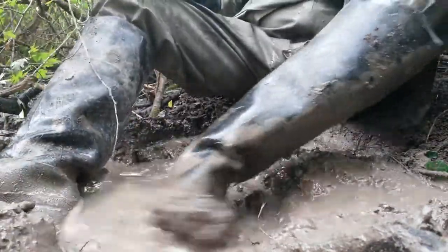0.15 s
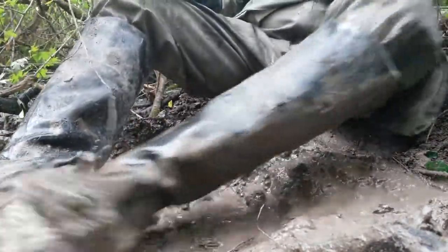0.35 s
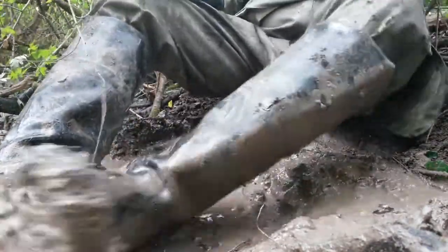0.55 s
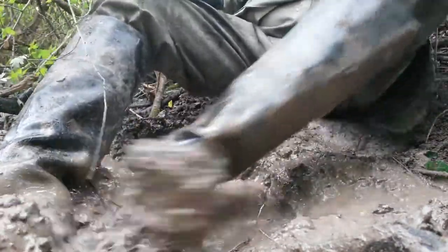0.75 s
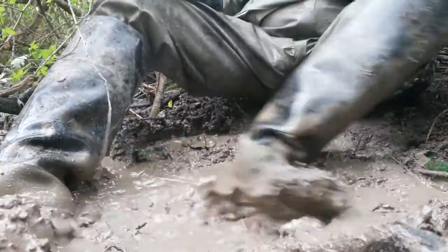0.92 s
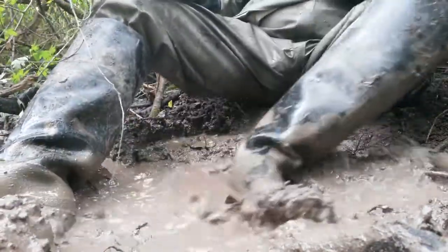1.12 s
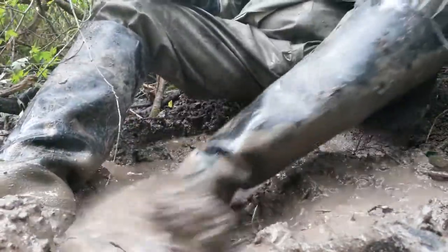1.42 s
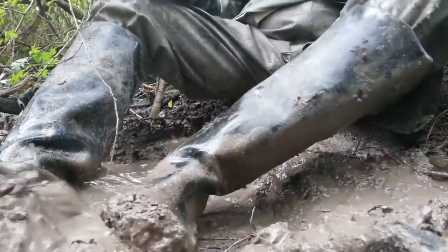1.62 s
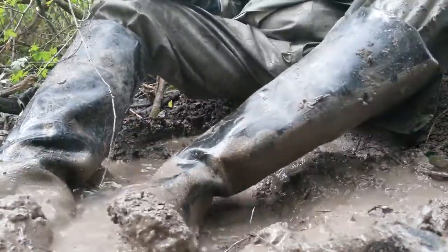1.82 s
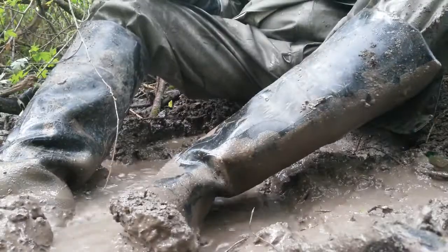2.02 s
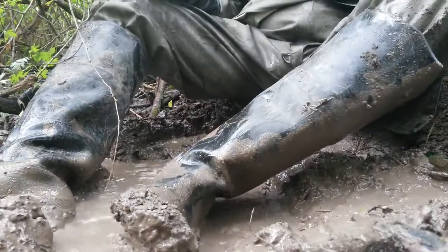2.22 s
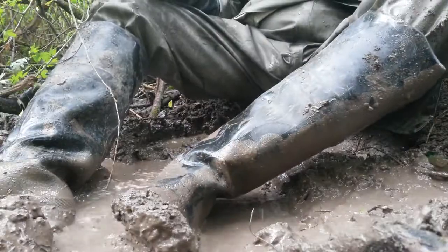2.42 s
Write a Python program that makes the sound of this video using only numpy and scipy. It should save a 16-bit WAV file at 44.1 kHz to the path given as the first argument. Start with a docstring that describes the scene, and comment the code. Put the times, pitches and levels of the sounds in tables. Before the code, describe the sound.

A rubber boot squelches through a muddy puddle close by, with gurgles, fizzing bubbles, wet snaps and droplet ticks over a faint low rumble. The sloshing builds from 0.2 seconds, with surges near 0.4, 0.65 and 1.0. A last squelch comes around 1.6, fading by 2 seconds. One dry electrical pop sounds on the right at 2.1, then only faint outdoor air remains.

```python
"""Sharp ticks sound over a faint fizz and a low rumble: a rubber boot sweeps to and fro through a muddy puddle,
close by in a quiet wood. Air pockets ring as rising bubbles, wet films snap, mud slaps back, and swarms of tiny
bubbles make the churned mud fizz and gurgle until the boot comes to rest. The microphone's two openings colour
the sound differently; in the stillness one dry electrical pop sounds on the right."""
import sys
import numpy as np
from scipy import signal
from scipy.fft import rfft, irfft, next_fast_len
from scipy.io import wavfile

SR = 44100
rng = np.random.default_rng(int(sys.argv[2]) if len(sys.argv) > 2 else 0)


def put_to_file(sound):
    """Save the sound as 16-bit audio at rate SR, in the file named by the first command-line argument."""
    columns = np.atleast_2d(sound).T  # one column per channel
    safe = np.clip(columns, -1, 1)
    whole_steps = np.round(safe * 32767)
    wavfile.write(sys.argv[1], SR, whole_steps.astype(np.int16))


N = 112454
T = np.arange(N) / SR
BUBBLE_LAG_S, CLICK_LAG_S = 0.00018, 0.00004  # how much later the left side hears a sound
SNAP_LEAD_S = 0.0032  # a film crackles this long before it rings


def undb(db):
    """Turn decibels into a volume factor."""
    return 10 ** (np.asarray(db) / 20)


def unit(x):
    """Scale a sound to an average strength (rms) of 1."""
    return x / np.sqrt(np.mean(x ** 2))


def colour(x, points):
    """Make some pitches louder and others softer, along a curve of (Hz, dB) points."""
    hz, db = np.array(points, float).T
    size = 2 * next_fast_len(N)
    freqs = np.maximum(np.fft.rfftfreq(size, 1 / SR), 1)
    gain = undb(np.interp(np.log(freqs), np.log(hz), db))
    # these steps make the filter ring only after a sound, never before it
    cepstrum = irfft(np.log(gain))
    cepstrum[1:size // 2] *= 2
    cepstrum[size // 2 + 1:] = 0
    return irfft(rfft(x, size) * np.exp(rfft(cepstrum)))[..., :N]


def noise(points, alike):
    """Coloured stereo noise; alike (0 to 1) is the share that both sides have in common."""
    white = rng.standard_normal((3, N))
    stereo = np.sqrt(alike) * white[2] + np.sqrt(1 - alike) * white[:2]
    return unit(colour(stereo, points))


def wander(per_second):
    """A curve that glides between random values, mostly within -1 to 1."""
    return np.interp(T * per_second, np.arange(2000), rng.standard_normal(2000))


def add(out, start_s, wave, pan_db=0., lag_s=0.):
    """Mix a short sound in; the left side gets it pan_db louder and lag_s later."""
    for channel, side in enumerate((1, -1)):
        first = max(int((start_s + side * lag_s / 2) * SR), 0)
        part = wave[:max(N - first, 0)]
        out[channel, first:first + len(part)] += part * undb(side * pan_db / 2)


def background():
    """Still air hisses faintly, and a low rumble lasts while the leg moves."""
    # tone of the air and of the rumble (frequency [Hz], relative level [dB])
    air_tone = [(20, -2.5), (45, 0.5), (70, 6), (150, 0.5), (300, -10), (700, -17), (2000, -22.5),
                (4800, -26), (7500, -31.5), (15000, -38)]
    rumble_tone = [(20, -24), (50, 5.5), (80, 4), (160, -2.5), (350, -9), (1000, -38.5), (15000, -79.5)]
    air = undb(-55) * noise(air_tone, alike=0.45)
    rumble = undb(-50.5 + 2 * wander(14)) * noise(rumble_tone, alike=0.9)
    moving = 1 / (1 + np.exp((T - 2.005) / 0.078))  # fades out around 2 s
    return air + moving * rumble


def bubble(hz, length_s, rise):
    """An air pocket rings, climbs in pitch as it surfaces (falls if rise is negative), and dies away."""
    fade_s = 0.39 * length_s
    t = np.arange(int((length_s + 6 * fade_s) * SR) + 2) / SR
    pitch = hz * (1 + rise * np.minimum((t / length_s) ** 2, 3))
    loudness = (1 - np.exp(-t * hz)) * np.exp(-np.maximum(t - 0.66 * length_s, 0) / fade_s)
    return loudness * np.sin(2 * np.pi * np.cumsum(pitch) / SR)


def swarm(count, low_hz, high_hz, cycles, spread_db, pan_db, rise):
    """Many small bubbles ring, each with a random time, pitch, loudness and place."""
    out = np.zeros((2, N))
    for when, pitch, size, ring, place, lag in rng.random((count, 6)):
        hz = min(low_hz * (high_hz / low_hz) ** pitch, SR / 3)
        db = spread_db * min(-np.log(1 - size), 3)  # most are quiet, a few are loud
        wave = undb(db) * bubble(hz, cycles * (0.5 + ring) / hz, rise)
        add(out, when * N / SR, wave, pan_db * (2 * place - 1), BUBBLE_LAG_S * 2 * lag)
    return unit(out)


def churned_mud():
    """The boot stirs the mud: fizzing spray over gurgles and a low wash."""
    # strength of the churning (time [s], relative spray level [dB], relative gurgle level [dB])
    churn = [(0, -58.5, -58), (.17, -57, -52.5), (0.239, -48.5, -35), (.28, -45, -46), (0.336, -45, -47),
             (.385, -34.5, -36.5), (.43, -40.5, -40), (.485, -43, -38), (.51, -45, -37), (.55, -45.5, -44),
             (.615, -33, -35.5), (.665, -40, -42.5), (.71, -45, -41), (0.793, -45, -44.5),
             (0.821, -34, -48), (.87, -49.5, -40.5), (.93, -45.5, -46.5), (0.974, -32.5, -41),
             (1.013, -30.5, -28), (1.059, -38, -42), (1.109, -38.5, -48), (1.16, -48.5, -53),
             (1.238, -38, -63), (1.29, -54.5, -55), (1.42, -54, -53), (1.48, -45, -46.5),
             (1.545, -55.5, -49.5), (1.638, -40, -55), (1.71, -51.5, -59.5), (1.8, -54, -62),
             (2, -64.5, -69), (2.2, -89, -84)]
    # tone of the fine mist and of the low wash (frequency [Hz], relative level [dB])
    mist_tone = [(20, -55), (500, -0.5), (1500, -2), (4500, 3), (7500, -8.5), (15000, -9.5)]
    wash_tone = [(20, -10), (60, -16), (140, 3), (300, -3), (700, -4), (1400, -13.5), (3000, -34.5),
                 (15000, -37.5)]
    times, spray_db, gurgle_db = np.array(churn).T
    fizz = swarm(5200, low_hz=1374, high_hz=15530, cycles=2.16, spread_db=4.5, pan_db=14.5, rise=0.095)
    mist = undb(-7.5) * noise(mist_tone, alike=0.17)
    flicker = undb(2.9 * np.tanh(wander(110)))
    spray = (undb(-3.5) * fizz + mist) * flicker
    glugs = swarm(1300, low_hz=371, high_hz=2284, cycles=1.83, spread_db=5.5, pan_db=10, rise=0.088)
    wash = undb(-6.5 + 2 * wander(37.96)) * noise(wash_tone, alike=0.94)
    gurgle = undb(-4.5) * glugs + wash
    return spray * undb(np.interp(T, times, spray_db)) + gurgle * undb(np.interp(T, times, gurgle_db))


def burst(hz, decay_s):
    """A small hollow tears open: a quickly dying tone, roughened by its ragged rim."""
    t = np.arange(int(7 * decay_s * SR) + 8) / SR
    ragged = np.interp(t * hz * 3, np.arange(512), rng.standard_normal(512))
    loudness = (1 - np.exp(-2 * t * hz)) * np.exp(-t / decay_s)
    return loudness * (np.sin(2 * np.pi * hz * t) + 0.39 * ragged)


def short_snaps():
    """Further wet films snap very briefly, each a tiny sharp tick with a common pitch."""
    # very short snaps (time [s], level [dB])
    ticks = [(.0175, -22), (.029, -23), (.0478, -23), (.1419, -8.5), (.3222, -13), (.388, -9),
             (.4065, -10), (.439, -15), (0.602, -11.5), (1.0858, -15), (1.089, -4), (1.0988, -5),
             (1.1355, -17), (1.186, -17), (1.2095, -28), (1.2277, -8), (1.4613, -15), (1.601, -9),
             (1.7315, -25)]
    out = np.zeros((2, N))
    for s, db in ticks:
        add(out, s, undb(db) * burst(hz=5500, decay_s=0.00007), lag_s=CLICK_LAG_S)
    return out


def air_pockets():
    """Single bubbles stand out; the torn rim of each rings briefly above its pitch."""
    # closing pockets (time [s], pitch [Hz], relative level [dB], length [ms], rise [share of pitch])
    pockets = [(0.187, 2120, -37, 5.2, 0.043), (.237, 690, -29.5, 4.1, 0.049),
               (0.2958, 934, -30.5, 6.6, 0.22), (0.3055, 1275, -24, 2.8, -0.023),
               (0.3737, 1118, -13.5, 2.5, -0.11), (.389, 640, -27, 2.3, 0.007),
               (.4317, 594, -23, 2.6, 0.072), (0.4444, 1300, -29, 6.9, 0.061),
               (0.566, 910, -24.5, 3.7, -0.078), (0.5747, 1165, -27.5, 8.7, 0.14),
               (0.5857, 1410, -18, 2.45, 0.2), (.5985, 660, -15, 3.03, 0.021), (.621, 557, -30.5, 10, 0.08),
               (0.6935, 1210, -21.5, 3.1, 0.052), (.8205, 690, -25.5, 3.9, -0.1),
               (.91, 724, -41, 23, -0.00089), (0.9637, 1060, -23.5, 3, -0.018),
               (1.181, 1940, -31, 3.4, -0.012), (1.2277, 846, -24, 20, 0.34),
               (1.313, 1284, -44, 7.9, -0.00017), (1.585, 1067, -31.5, 11.3, -0.013),
               (1.6145, 955, -16.5, 3.26, -0.02), (1.6197, 805, -16.5, 4.3, -0.011),
               (1.6275, 800, -28, 5, -0.014), (1.7306, 980, -33.5, 3.9, -0.099),
               (1.779, 1067, -31.5, 4.5, -0.037)]
    out = np.zeros((2, N))
    for s, hz, db, ms, rise in pockets:
        add(out, s, undb(db + 0.5) * bubble(hz, ms / 1000, rise), lag_s=BUBBLE_LAG_S)
        rim = undb(db - 5) * burst(2.22 * hz, decay_s=0.00092)
        add(out, s, rim, lag_s=BUBBLE_LAG_S)
    return out


def snap(hz, decay_s):
    """A wet film tears with a brief swelling crackle and leaves its small hollow ringing."""
    crackle_s = 0.0008
    t = np.arange(int((7 * decay_s + 10 * crackle_s) * SR) + 8) / SR - SNAP_LEAD_S
    since_tear = np.maximum(t, 0)
    jitter, hiss = rng.standard_normal((2, 2048))
    waver = np.interp(since_tear * hz / 2, np.arange(len(jitter)), jitter)
    loudness = (1 - np.exp(-since_tear * hz / 2)) * np.exp(-since_tear / decay_s)
    ring = loudness * np.sin(2 * np.pi * hz * since_tear + waver)
    crackle = np.resize(hiss, len(t)) * np.exp(-np.abs(t) / crackle_s) / 2
    return ring + undb(-13) * crackle


def wet_films():
    """Thin films of wet mud snap one after another."""
    # tearing films (time [s], pitch [Hz], relative level [dB], fade time [ms])
    tears = [(0.3191, 10200, -6.5, 0.21), (0.343, 4480, -24, 0.97), (.372, 4450, -22, 0.68),
             (0.51, 4500, -19.5, 0.75), (0.5729, 4290, -13, 1.25), (0.5769, 9370, -13, 0.61),
             (0.604, 4800, -15, 1.15), (0.6209, 4200, -5.5, 0.35), (0.6224, 7200, -15, 0.26),
             (0.637, 3160, -16, 0.53), (.6547, 6200, -22, 0.36), (0.677, 5500, -19.5, 0.49),
             (0.6907, 2650, -19.5, 1.23), (0.7174, 5300, -21, 0.78), (.7415, 4840, -27, .8),
             (0.8194, 3500, -10.5, 0.49), (0.8468, 4520, -19, 0.7), (0.9305, 4950, -25.5, 1),
             (0.9326, 4700, -23.5, 1.4), (0.9631, 4230, -17, 1.23), (1.0002, 5800, -26, .7),
             (1.011, 2530, -12.5, 0.86), (1.0413, 5030, -27, 0.65), (1.1303, 4700, -26.5, 1.2),
             (1.1858, 3410, -16, 1.53), (1.2218, 4900, -32.5, 0.85), (1.5709, 5500, -20, 0.62),
             (1.5775, 2610, -18, 0.78), (1.617, 2780, -13.5, 0.79), (1.64, 5760, -18, 0.59),
             (1.6471, 4270, -12, 0.56), (1.668, 5200, -26, 1.6), (1.6797, 4280, -20.5, 1.34),
             (1.699, 11100, -23, 0.36), (1.7811, 4760, -14, 0.37)]
    out = np.zeros((2, N))
    for s, hz, db, ms in tears:
        add(out, s - SNAP_LEAD_S, undb(db + 0.5) * snap(hz, ms / 1000), lag_s=CLICK_LAG_S)
    return out


def mud_slaps():
    """Mud slaps shut, and its weight puts a low thud under each slap."""
    # slaps of mud (time [s], pitch [Hz], relative level [dB], fade time [ms])
    slaps = [(0.4597, 165, -10.5, 3.7), (0.6772, 680, -11.5, 0.89), (0.6894, 1283, -6, 1.57),
             (0.6899, 295, -12, 2.08), (0.8057, 1510, -18.5, 0.77), (0.8178, 1310, -26, 3),
             (1.0088, 257, -20, 2.8), (1.0127, 718, -15, 2.3), (1.0142, 1290, -13, 1.3),
             (1.1352, 860, -23.5, 1.06), (1.2277, 1976, -22, 2.5), (1.461, 1530, -20.5, 0.88),
             (1.4908, 380, -25, 2.2), (1.5765, 1540, -13.5, 0.81), (1.6457, 382, -17, 1.7),
             (1.647, 2110, -14, 0.6)]
    out = np.zeros((2, N))
    for s, hz, db, ms in slaps:
        add(out, s, undb(db + 1.5) * burst(hz, ms / 1000), lag_s=BUBBLE_LAG_S)
        thud = undb(db - 25) * burst(hz=235, decay_s=0.0043)
        add(out, s, thud, lag_s=BUBBLE_LAG_S)
    return out


def short_echo(x):
    """Boots and banks throw the sound back as a very short, blurred tail."""
    fade_s, swell_s = 0.0047, 0.00059
    t = np.arange(SR // 8) / SR
    tail = rng.standard_normal((2, len(t))) * np.exp(-t / fade_s) * (1 - np.exp(-t / swell_s))
    tail /= np.sqrt(np.sum(tail ** 2, axis=1, keepdims=True))
    return undb(-10) * signal.fftconvolve(x, tail, axes=1)[:, :N]


def electrical_pop():
    """The right channel pops: a sudden jump that swings back through zero."""
    start_s, swing_hz, fade_s = 2.0891, 74, 0.0027
    t = np.maximum(T - start_s, 0)
    angle = 2 * np.pi * swing_hz * t
    loudness = (1 - np.exp(-2 * t * SR)) * np.exp(-t / fade_s)
    jump = loudness * (np.cos(angle) - 0.75 * np.sin(angle))
    return np.array([np.zeros(N), undb(-0.95) * jump])


def scene():
    """Mud and water among the trees."""
    puddle = air_pockets() + mud_slaps() + wet_films() + short_snaps() + churned_mud()
    return puddle + short_echo(puddle) + background()


def record(dry):
    """Each microphone opening boosts its own pitches; the right side pops; the highest treble is cut."""
    # tone of the left and right openings (frequency [Hz], gain [dB])
    left_tone = [(40, -5.5), (400, -2.5), (1000, -3), (2200, -0.5), (3700, 4), (4400, 8.5), (4900, 15.5),
                 (5500, 10.5), (7500, 5), (9800, 1), (13000, 10), (16000, -6.5)]
    right_tone = [(40, -2.5), (400, 2), (1000, 5), (2200, -2.5), (3700, 2), (5000, -2), (7500, 3.5),
                  (8800, 11), (9700, 13.5), (11000, 11.5), (13000, 11), (16000, 9)]
    heard = np.array([colour(dry[0], left_tone), colour(dry[1], right_tone)]) + electrical_pop()
    treble_cut = signal.ellip(8, 0.2, 70, 14750, fs=SR, output="sos")
    return signal.sosfilt(treble_cut, heard)


dry = scene()
out = record(dry)
put_to_file(out)
```